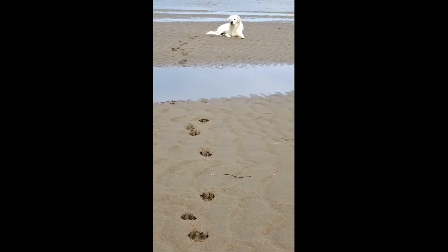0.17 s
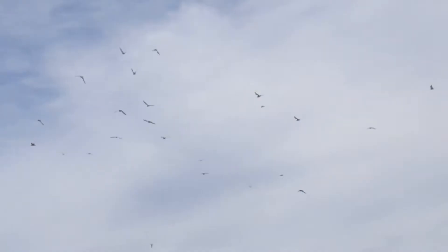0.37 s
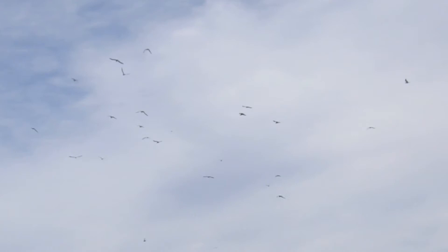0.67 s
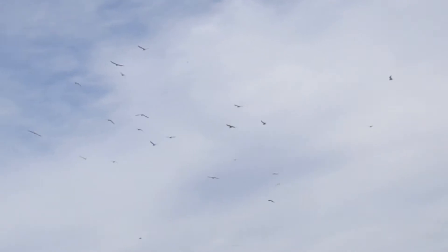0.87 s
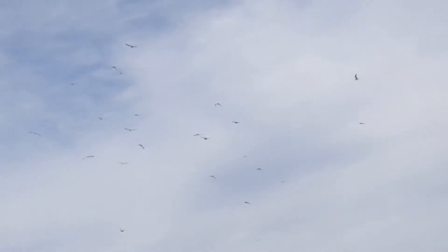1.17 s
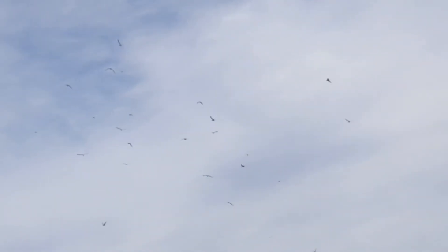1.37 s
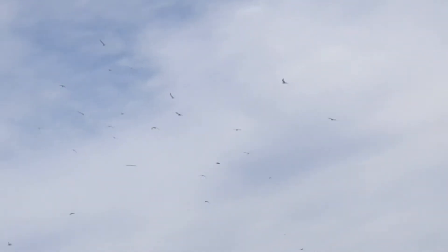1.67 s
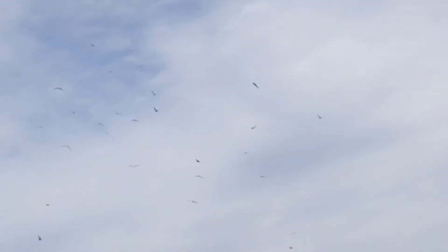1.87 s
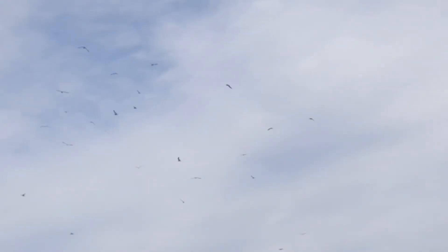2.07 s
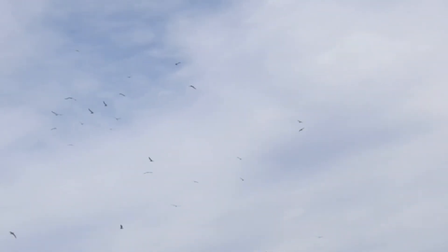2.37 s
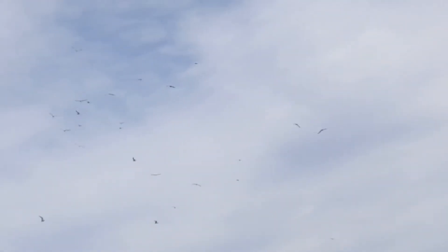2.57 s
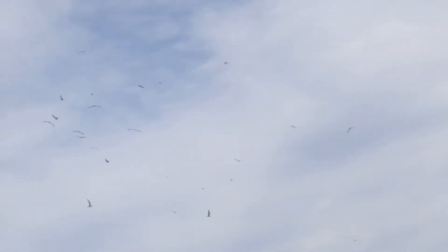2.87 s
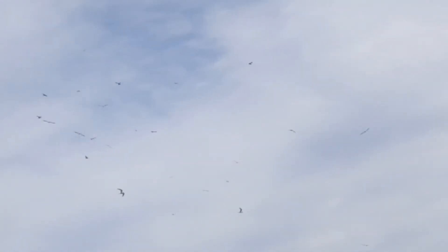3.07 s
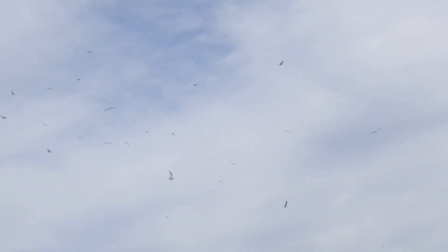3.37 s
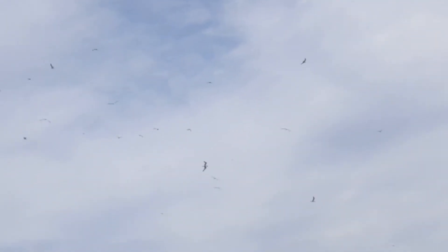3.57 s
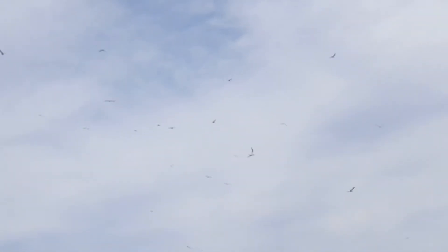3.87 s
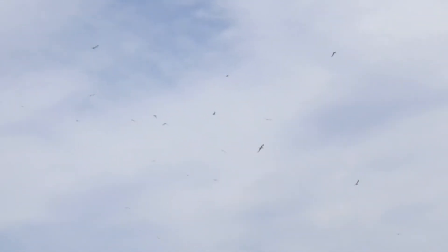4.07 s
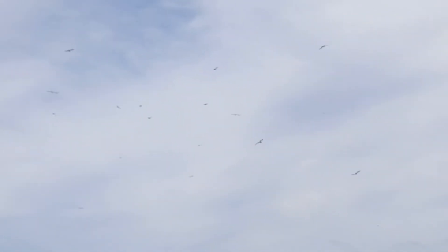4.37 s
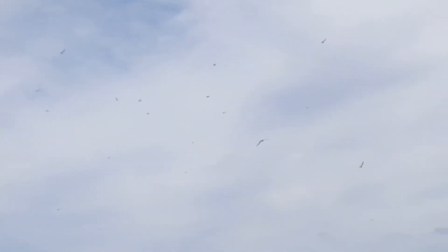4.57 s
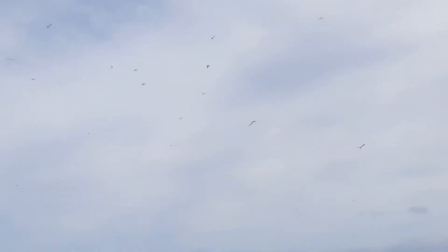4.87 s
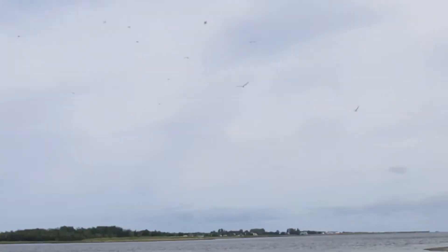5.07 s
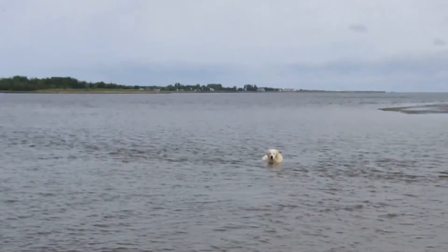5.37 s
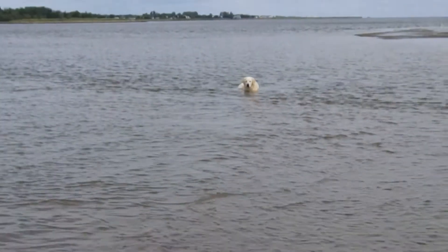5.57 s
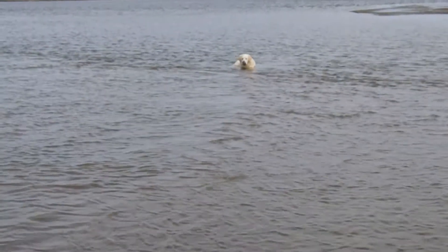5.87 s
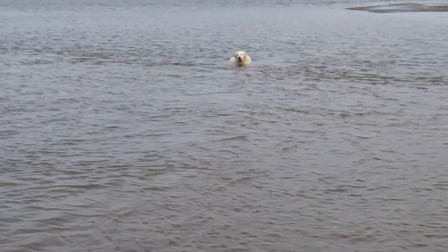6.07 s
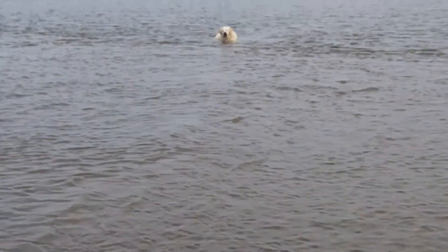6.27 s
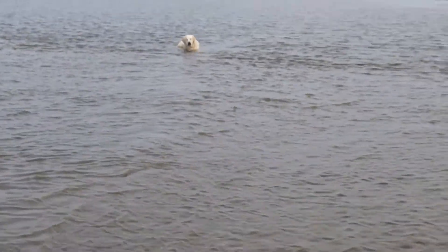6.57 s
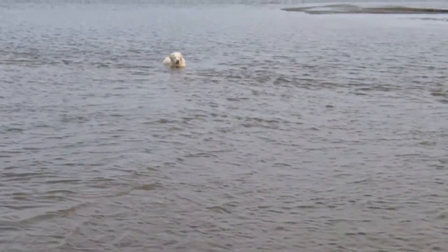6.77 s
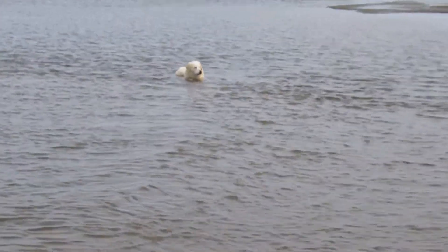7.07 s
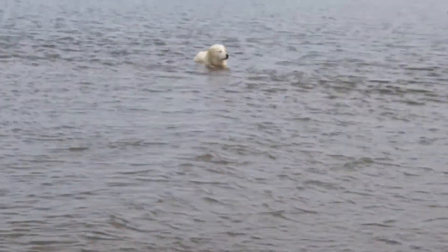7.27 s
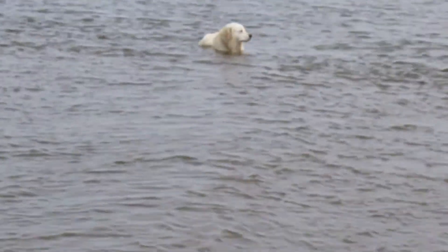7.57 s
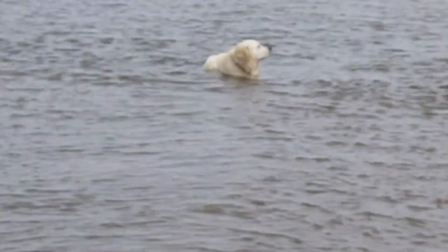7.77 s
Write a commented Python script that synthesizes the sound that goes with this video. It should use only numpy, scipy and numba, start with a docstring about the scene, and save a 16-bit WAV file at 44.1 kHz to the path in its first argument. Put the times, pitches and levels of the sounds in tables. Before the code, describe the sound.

Soft wind and small sea ripples lie under the harsh scolds and clipped calls of a few gulls. Then a dog's legs churn the shallows close by, with bubbling plops and splashes that grow stronger, heard from a microphone in a waterproof housing that takes some dull knocks. The wading peaks late, a drop hits the housing with a bright crack, the background briefly dips, and gentler splashing and gull calls continue.

```python
"""Shallow sea, heard from inside a camera's splash-proof case, whose port cuts deep dips into the treble.
Wind, lapping ripples and hiss open the scene, with sea birds overhead giving rasping, pulsed scolds
and sharp kip calls. From about 3.3 s wading legs churn up bubbles stroke by stroke: the water sloshes,
gulps and splashes, and a few slops knock on the case. The biggest stroke comes near 6.5 s, then a drop
cracks on the port, the background dips for a while, and the birds call on over lighter strokes."""
import sys
import numpy as np
from scipy import signal
from scipy.fft import rfft, irfft
from scipy.io import wavfile
from scipy.ndimage import uniform_filter1d
from numba import njit

SR = 44100
rng = np.random.default_rng(int(sys.argv[2]) if len(sys.argv) > 2 else 0)


def materialize(psi):
    """Save the field psi as 16-bit PCM at rate SR to the path in sys.argv[1].

    A 1-D psi becomes a single channel; in a 2-D psi each row is a channel.
    """
    bounded = np.clip(np.atleast_2d(psi).T, -1, 1)
    quanta = np.round(bounded * 32767).astype(np.int16)
    wavfile.write(sys.argv[1], SR, quanta)


N = 349272

# Tone of the wind, far ripples and hiss. Each row: frequency in Hz, relative level in dB.
WIND_EQ = [(20, 0.5), (45, 1), (85, 0), (150, -6.5), (250, -17.5), (500, -30.5)]
RIPPLE_EQ = [(120, -1), (250, -1.5), (400, 0), (600, -5), (1100, -9), (2000, -14.5), (3000, -13.5),
             (4500, -17), (7000, -39)]
HISS_EQ = [(3000, -7), (6000, 1), (9000, -1.5), (14000, 3.5), (15500, -1)]
# Gusts on the case. Each row: time in seconds, level in dB.
GUSTS = [(.36, -40.5), (1.4, -43), (2.6, -38), (3.7, -42.5), (7.9, -37.5)]
# Wind, ripples and hiss dip together for a while after the drop. Each row: time in seconds, gain in dB.
BED_DIP = [(6.82, 2), (6.87, -5.5), (7.2, -6), (7.6, -1), (7.92, 0)]
# Notches of the case's port. Each row: centre in Hz, width in Hz, depth in dB.
PORT_NOTCHES = [(3128, 1200, -45), (4077, 276, -43), (5153, 710, -33), (5697, 970, -35), (7210, 510, -30)]

# Rasping scolds. Each row: start and length in seconds, first and last pitch in Hz, level in dB,
# harshness from 0 to 1, treble gain in dB.
SCOLD_CALLS = [(0.329, .58, 1280, 1230, -28, .85, -5), (.34, .22, 1500, 1380, -31, .3, -5),
               (1.829, .16, 1610, 1570, -32, .3, 4), (1.94, .21, 1550, 1390, -29.5, .3, -10),
               (2.411, .13, 1190, 1210, -37, 0.83, 9), (2.585, .55, 1170, 1085, -32.7, .65, 2),
               (2.65, .5, 1650, 1500, -33.5, .25, 7), (3.09, .51, 1160, 1240, -31, .72, -3.5),
               (3.655, 0.26, 1533, 1500, -29, 0.11, -16), (5.085, .22, 1470, 1330, -27.5, .15, -17),
               (5.876, 0.27, 1740, 1586, -31, .12, -16), (7.11, .29, 1570, 1530, -37.5, .25, -3),
               (7.41, .46, 1535, 1500, -36, .2, 7)]
# Tone of a bird's throat. Each row: frequency in Hz, gain in dB.
THROAT_EQ = [(1300, -13), (1800, -2.5), (2200, 2.5), (2800, 6.5), (3600, 1), (4500, -0.5), (5400, -16),
             (6400, -16), (8000, -39), (11000, -36)]
# Kip calls. Each row: start and length in seconds, pitch in Hz, level in dB,
# first partial against the second in dB.
KIP_CALLS = [(0.376, 0.058, 1802, -21.5, -14), (0.986, 0.012, 1884, -27, -17),
             (1.362, 0.06, 1904, -19, -17), (2.012, 0.012, 1900, -28, -8), (2.253, 0.028, 2270, -50, 14),
             (2.371, 0.052, 1882, -19, -17.5), (3.117, 0.014, 1910, -31, -7),
             (3.306, 0.072, 1855, -23.5, -12.5), (3.657, 0.027, 1934, -28, -6.5),
             (4.145, 0.061, 1808, -26.5, -15.5), (4.875, 0.053, 1855, -28, -21),
             (5.32, 0.027, 1920, -32, -19), (6.936, 0.07, 1934, -41, -4), (7.029, 0.016, 1950, -38, -15),
             (7.321, 0.059, 1930, -38.5, -10), (7.695, 0.044, 1904, -29.5, -7)]
# Pitch bend of a kip. Each row: share of a full call, pitch ratio.
KIP_BEND = [(0, .985), (.25, 1.01), (.52, .985), (.64, .91), (.8, .77), (1, 0.677)]
# Envelope of a kip. Each row: share of the call, gain in dB.
KIP_ENVELOPE = [(0, 1.5), (.14, 0.5), (.42, 3), (.62, -2), (.8, -6.5), (1, -6)]
# A kip breaks up as it ends. Each row: share of the call, roughness from 0 to 1.
KIP_BREAKUP = [(0, .1), (.58, .07), (.82, .28), (1, .65)]
# Upper partials of a kip. Each row: multiple of the pitch, level against the second partial in dB.
KIP_OVERTONES = [(3, -10), (4, -31.5), (5, -34.5), (6, -34.5)]

# Shrinking air pockets. Each row: start and length in seconds, first and last pitch in Hz, level in dB.
GURGLE_CUES = [(2.958, 0.037, 920, 1420, -35), (3.52, 0.033, 1270, 1920, -39),
               (3.746, 0.035, 576, 1120, -26.5), (4.6, 0.051, 289, 499, -22.5),
               (5.579, 0.045, 461, 730, -18), (6.341, 0.034, 706, 1000, -26),
               (7.023, 0.031, 519, 634, -27.5), (7.079, 0.063, 703, 1404, -35.5),
               (7.27, 0.031, 547, 910, -35)]
# How hard the water is stirred between strokes. Each row: time in seconds, level in dB.
SLOSH_LEVEL = [(3.3, -41.5), (3.55, -38.5), (4.15, -42), (4.8, -36), (5.6, -36.5), (6.75, -33), (7.1, -46),
               (7.9, -37.5)]
# Legs sweep through the water. Each row: start and length in seconds, then churn, splash and spray in dB.
LEG_STROKES = [(3.51, .16, -50, -29.5, -46), (3.746, .09, -50, -31, -50), (3.85, .12, -32, -38, -46),
               (4.33, .14, -30, -37, -40), (4.497, .04, -30, -27, -48), (4.6, .04, -29, -30, -56),
               (4.73, .13, -31, -30, -38), (4.93, .14, -27, -25, -39), (5.15, .2, -28, -32, -36.5),
               (5.38, .14, -26, -31, -45), (5.539, .16, -28, -21.5, -37), (5.80, .13, -33, -25.5, -40),
               (5.99, .14, -20, -31.5, -53), (6.25, .16, -22, -39, -42), (6.48, .12, -17.5, -19.5, -36),
               (6.62, .18, -35, -20.5, -34.5), (6.95, .06, -44, -27.5, -50), (7.22, .18, -60, -39.5, -48),
               (7.45, .18, -47, -30, -39), (7.676, .12, -43, -30, -40)]
# Tone of the churn, splash and fine spray. Each row: frequency in Hz, gain in dB.
CHURN_EQ = [(60, -11.5), (150, -3), (280, -10), (420, 2), (560, -8), (900, -21)]
SPLASH_EQ = [(400, -6), (700, 4), (1400, 2.5), (2000, -2), (2600, 0.5), (3700, -7.5), (4600, -7.5),
             (6500, -29), (9000, -28)]
SPRAY_EQ = [(2500, 11), (4400, 8), (6500, 2.5), (8000, -5.5), (10000, 2), (12000, -9), (15500, -9)]
# Slops against the case. Each row: start in seconds, pitch in Hz, level in dB, length in seconds.
CASE_KNOCKS = [(3.412, 83.5, -10.5, 0.019), (3.421, 323, -8, 0.01), (4.749, 197, -10, 0.011),
               (6.217, 77.6, -1, 0.017), (6.303, 212, -6, 0.009), (6.49, 110, -14, .05),
               (6.818, 109, -4.5, 0.0087)]
# The largest air pockets. Each row: start in seconds, first pitch in Hz, level in dB, cycles to die away.
AIR_POCKETS = [(.585, 342, -20.5, 12), (3.514, 1250, -15, 26), (3.635, 850, -12.5, 5),
               (3.7416, 559, -7, 21), (3.89, 637, -13.5, 18), (3.981, 810, -15.5, 7), (4.2, 2300, -15, 12),
               (4.333, 1470, -18.5, 48), (4.502, 590, -17, 13), (4.596, 401, -15.5, 12),
               (4.631, 382, -13.5, 17), (4.7593, 378, -1, 7.5), (4.825, 2200, -3.5, 15),
               (4.852, 1410, -3.5, 14), (4.867, 1600, -9.5, 17), (4.92, 1650, -10.5, 34),
               (4.97, 2720, -11, 20), (5.065, 395, -12.5, 8), (5.228, 520, -9.5, 5.7),
               (5.39, 458, -15.5, 22), (5.467, 387, -10.5, 19), (5.541, 1350, -10.5, 58),
               (5.554, 390, -4.5, 13), (5.592, 507, -12, 22), (5.686, 915, -5, 24), (5.689, 2000, -5.5, 13),
               (5.754, 2140, -12.5, 22), (5.844, 1240, -9, 33), (5.995, 385, -7, 31), (6.043, 289, -5, 50),
               (6.063, 350, -7, 18), (6.083, 425, -8, 41), (6.444, 1340, -14, 21), (6.48, 366, -4, 16),
               (6.509, 298, -0.5, 7.5), (6.531, 390, 0, 9), (6.561, 482, -5, 11), (6.577, 406, -6, 20),
               (6.8261, 368, 2.5, 12), (6.962, 850, -14, 7), (7.243, 556, -21, 17), (7.381, 347, -19, 20),
               (7.562, 2540, -9, 22), (7.702, 1000, -15, 14), (7.708, 2550, -11, 20), (7.907, 438, -11, 14)]
# Water thrown down on water. Each row: start in seconds, level in dB, decay time in seconds.
SPLAT_CUES = [(3.635, -28, 0.0025), (4.504, -42, 0.018), (4.71, -23, 0.0065), (4.972, -18.5, 0.017),
              (5.328, -23, 0.0083), (5.686, -24, 0.0091), (5.753, -26, 0.0088), (5.792, -25, .005),
              (6.22, -18.5, 0.0025), (6.48, -33, .005), (6.494, -17, 0.028), (6.96, -27, 0.0033),
              (7.763, -18, 0.0054)]
# Tone of the splats and of the drop on the port. Each row: frequency in Hz, gain in dB.
SPLAT_EQ = [(500, 0), (1200, -3.5), (2500, -1.5), (4500, 8), (6500, -22), (10000, -16), (15000, -28)]
DROP_EQ = [(1000, -13), (4500, 6.5), (7000, -20), (10000, -16), (12400, -7), (13200, 8), (14200, -8),
           (15500, -18)]


def undb(db):
    """Decibels to gain."""
    return 10 ** (np.asarray(db) / 20)


def along(x, table):
    """Straight lines through the rows of a two-column table."""
    return np.interp(x, *np.transpose(table))


def unit(x):
    """Scale to rms 1."""
    return x / np.sqrt(np.mean(x ** 2))


def colour(x, eq, size=2048):
    """Minimum-phase EQ that keeps attacks sharp and falls 24 dB an octave beyond the curve's ends."""
    hz, db = np.transpose(eq)
    octave, knots = np.log2(np.maximum(np.fft.rfftfreq(size, 1 / SR), 1)), np.log2(hz)
    curve_db = np.interp(octave, knots, db) - 24 * np.abs(octave - np.clip(octave, knots[0], knots[-1]))
    cepstrum = irfft(np.log(undb(curve_db)))
    cepstrum[1:size // 2] *= 2
    cepstrum[size // 2 + 1:] = 0
    return signal.fftconvolve(x, irfft(np.exp(rfft(cepstrum))))[:len(x)]


def walk(rate_hz):
    """A smooth random modulator of rms 1."""
    hold = max(int(SR / rate_hz), 1)
    return unit(uniform_filter1d(np.repeat(rng.standard_normal(N // hold + 1), hold), hold)[:N])


def add(out, start_s, x):
    """Mix a sound in at a time."""
    i = int(start_s * SR)
    out[i:i + len(x)] += x[:max(N - i, 0)]


@njit
def ring(starts, hz, cycles, sizes, rise, onset_cycles):
    """Each bubble is a sine that swells as its neck closes, dies away and climbs in pitch."""
    out = np.zeros(N)
    for k in range(len(starts)):
        first, life = int(starts[k] * SR), cycles[k] * SR / hz[k]
        step = 2 * np.pi * hz[k] / SR
        turn = np.exp(1j * step - 6.9 / life)  # 60 dB down over its life
        glide = np.exp(1j * step * rise[k] / life)
        swell = onset_cycles * SR / hz[k]
        phasor = sizes[k] * np.exp(6.9 * swell / life) + 0j
        for i in range(min(int(life + swell), N - first)):
            u = min(i / swell, 1.)
            out[first + i] += phasor.imag * u * u * (3 - 2 * u)
            phasor *= turn
            turn *= glide
    return out


def cloud(eq, per_s, low_hz, high_hz, cycles, spread_db, wash, onset_cycles):
    """A swarm of bubbles of all sizes over a wash of noise, at an even level."""
    when, pitch, life, size, climb = rng.random((int(per_s * N / SR), 5)).T
    hz = low_hz * (high_hz / low_hz) ** pitch
    sizes = undb(-spread_db * np.log(.0054 + size)) * hz / high_hz  # small ones die sooner, so hit harder
    swarm = ring(when * N / SR, hz, cycles * (.5 + life), sizes, .58 * climb, onset_cycles)
    x = colour(unit(swarm) + wash * rng.standard_normal(N), eq)
    return x / np.sqrt(uniform_filter1d(x ** 2, SR // 10))


def ripples():
    """Small far ripples lap in a gently swelling wash of bubbles."""
    lapping = cloud(RIPPLE_EQ, per_s=900, low_hz=200, high_hz=2504,
                    cycles=16.5, spread_db=2.3, wash=2.4, onset_cycles=1.23)
    return lapping * undb(-41 + .75 * walk(4.11))


def rumble(churn):
    """Wind rumbles on the case; churning water adds a push that levels off."""
    gusts = undb(along(np.arange(N) / SR, GUSTS))
    water_push = np.minimum(undb(-8) * churn, undb(-28.5))
    noise = unit(colour(rng.standard_normal(N), WIND_EQ))
    return noise * np.hypot(gusts, water_push) * undb(1.26 * walk(10))


def hiss():
    """A faint, steady, bright hiss."""
    return unit(colour(rng.standard_normal(N), HISS_EQ)) * undb(-51)


def port(x):
    """The port of the case cancels a few narrow bands."""
    for hz, width, db in PORT_NOTCHES:
        x = x - (1 - undb(db)) * signal.lfilter(*signal.iirpeak(hz, hz / width, fs=SR), x)
    return x


def scolds(pulse_hz=52.4, duty=.85, attack_s=.025, release_s=.033, swell_db=2, fade_db=1):
    """Birds scold in quick syllables, each an arch of pitch; harsh calls shake until the partials smear."""
    out, shake, pace, force, drift = np.zeros(N), walk(2200), walk(60), walk(70), walk(35)
    for start, length, first_hz, last_hz, db, harsh, treble_db in SCOLD_CALLS:
        u = np.linspace(0, 1, int(length * SR))
        here = slice(int(start * SR), int(start * SR) + len(u))
        beat = np.cumsum(pulse_hz * (1 + .06 * pace[here])) / SR % 1
        syllable = np.sin(np.pi * np.minimum(beat / duty, 1))
        glide_hz = first_hz + (last_hz - first_hz) * u ** 1.3  # slides faster toward the end
        bend = .07 * (syllable - .85) + .014 * drift[here] + .1 * harsh * shake[here]
        phase = 2 * np.pi * np.cumsum(glide_hz * (1 + bend)) / SR
        tone = unit(harsh * np.sin(phase) + sum(np.sin(k * phase) for k in range(2, 7)))
        rasp = .95 * harsh * rng.standard_normal(len(u))
        throat = [(hz, gain_db + treble_db * (hz > 3200)) for hz, gain_db in THROAT_EQ]
        call = unit(colour((tone + rasp) * (syllable + .14), throat))  # never quite shut between syllables
        fades = np.clip(length * np.minimum(u / attack_s, (1 - u) / release_s), 0, 1)
        effort_db = swell_db * (np.sin(np.pi * u) - 2 / np.pi) + fade_db * (.5 - u) + 1.1 * force[here]
        add(out, start, call * fades * undb(db + effort_db))
    return out


def kips(full_call_s=.055, flutter_db=1.5, tail_db=-16, tail_s=.046):
    """Short clear bird calls, most led by the second partial, that drop in pitch and break up."""
    out, jitter, flutter = np.zeros(N), walk(2000), walk(170)
    for start, length, hz, db, first_db in KIP_CALLS:
        u = np.linspace(0, 1, int(length * SR))
        here = slice(int(start * SR), int(start * SR) + len(u))
        rough = np.maximum(along(u, KIP_BREAKUP), .43 * (length < .02))  # the shortest never ring clear
        bend = along(u * min(length / full_call_s, 1), KIP_BEND)  # short calls stop before the fall
        phase = 2 * np.pi * np.cumsum(hz * bend * (1 + .1 * rough * jitter[here])) / SR
        partials = [(1, first_db), (2, 0)] + KIP_OVERTONES
        tone = np.sqrt(2) * sum(undb(level) * np.sin(k * phase) for k, level in partials)
        rasp = .8 * rough * unit(colour(rng.standard_normal(len(u)), THROAT_EQ))
        gain = undb(db + along(u, KIP_ENVELOPE) + flutter_db * flutter[here])
        fades = np.clip(20 * np.minimum(u, 1 - u), 0, 1)
        add(out, start, (tone + rasp) * gain * fades)
    # the rippled sea scatters a brief tail back
    scatter = rng.standard_normal(SR // 10) * np.exp(-np.arange(SR // 10) / SR / tail_s)
    return out + undb(tail_db) * signal.fftconvolve(out, scatter / np.linalg.norm(scatter))[:N]


def gurgles():
    """Air pockets wobble upward in pitch as they shrink."""
    out, wobble = np.zeros(N), walk(250)
    for start, length, first_hz, last_hz, db in GURGLE_CUES:
        u = np.linspace(0, 1, int(length * SR))
        shake = wobble[int(start * SR):][:len(u)]
        hz = first_hz * (last_hz / first_hz) ** u * (1 + .028 * shake)
        envelope = undb(db + 3.1 * shake) * np.sin(np.pi * u)
        add(out, start, envelope * np.sin(2 * np.pi * np.cumsum(hz) / SR))
    return out


def stirring(attack_s=.025, release_s=.03):
    """Envelopes of churn, splash and spray: each leg stroke swells, holds and dies away over the slosh."""
    t = np.arange(N) / SR
    slosh = undb(along(t, SLOSH_LEVEL)) * np.clip((t - SLOSH_LEVEL[0][0]) * 10, 0, 1)
    power = np.outer(undb([1.5, 0, -8.5]), slosh) ** 2  # the three layers' balance between strokes
    for start, length, *layers_db in LEG_STROKES:
        attack = np.clip((t - start) / attack_s + .5, 0, 1)
        release = np.exp(-np.clip((t - start - length) / release_s, 0, 20))
        power += np.outer(undb(layers_db), attack * release) ** 2
    return np.sqrt(power)


def wading(churn, splash, spray):
    """Legs churn big bubbles, throw splashes and scatter fine spray in fits."""
    big = cloud(CHURN_EQ, per_s=170, low_hz=195.6, high_hz=709,
                cycles=16.4, spread_db=3, wash=.94, onset_cycles=.9)
    middle = cloud(SPLASH_EQ, per_s=650, low_hz=509, high_hz=4750,
                   cycles=30.5, spread_db=2.7, wash=.9, onset_cycles=1.34)
    fine = cloud(SPRAY_EQ, per_s=1500, low_hz=3090, high_hz=12800,
                 cycles=8, spread_db=4.8, wash=.35, onset_cycles=1.0)
    return (big * churn * undb(walk(25))
            + middle * splash * undb(walk(30))
            + fine * spray * undb(2.6 * walk(32) + 3))


def knocks():
    """Slops push the case for a few cycles at most: short, dull thumps."""
    out = np.zeros(N)
    for start, hz, db, length in CASE_KNOCKS:
        t = np.arange(int(length * SR)) / SR
        envelope = undb(db) * np.sin(np.pi * t / length) ** 1.7
        add(out, start, -envelope * np.sin(2 * np.pi * hz * t))
    return out


def gulps(rise=.25):
    """The largest air pockets close, each with a rising plop of its own."""
    starts, hz, db, cycles = (np.array(column) for column in np.transpose(AIR_POCKETS))
    return ring(starts, hz, cycles, undb(db), np.full(len(starts), rise), onset_cycles=.65)


def splats():
    """A sheet of water lands and breaks into a burst of tiny bubbles."""
    envelope = np.zeros(N)
    for start, db, decay_s in SPLAT_CUES:
        add(envelope, start, undb(db) * np.exp(-np.arange(SR // 6) / SR / decay_s))
    return envelope * cloud(SPLAT_EQ, per_s=3000, low_hz=600, high_hz=9000,
                            cycles=12, spread_db=1.5, wash=.6, onset_cycles=.8)


def drop(start_s=6.8243, length_s=.0024, gain_db=-4):
    """One drop lands right on the port with a bright crack."""
    out = np.zeros(N)
    contact = np.sqrt(np.hanning(int(length_s * SR)))
    crack = unit(colour(rng.standard_normal(len(contact)), DROP_EQ))
    add(out, start_s, crack * contact * undb(gain_db))
    return out


def scene():
    """Water, birds and the background bed, all heard through the port of the case."""
    churn, splash, spray = stirring()
    water = wading(churn, splash, spray) + gurgles() + gulps() + splats() + knocks() + drop()
    birds = kips() + scolds()
    bed = (ripples() + rumble(churn) + hiss()) * undb(along(np.arange(N) / SR, BED_DIP))
    return port(water + birds + bed)[None]


def record(dry):
    """The sound cuts in after a short silence, its highest peaks clipped and its top end rolled off."""
    start_s, ceiling, top_hz = .36, .74, 15900
    clipped = np.clip(dry, -ceiling, ceiling) * (np.arange(N) / SR >= start_s)
    return signal.sosfilt(signal.ellip(8, .2, 70, top_hz, fs=SR, output="sos"), clipped)


dry = scene()
out = record(dry)
materialize(out)
```